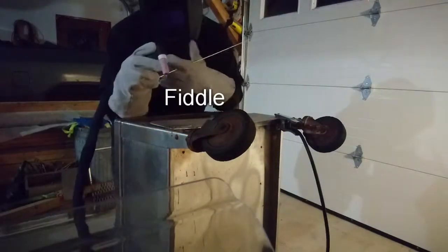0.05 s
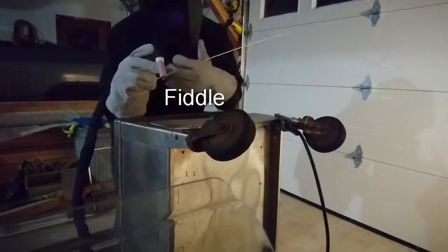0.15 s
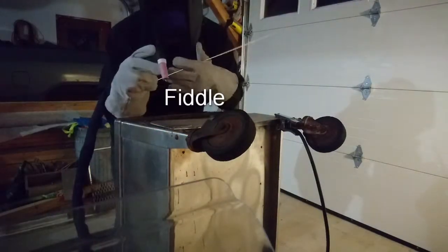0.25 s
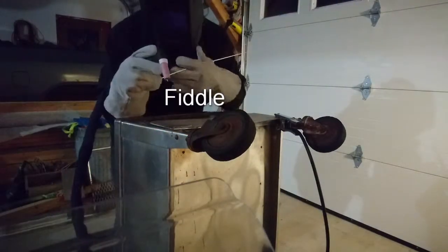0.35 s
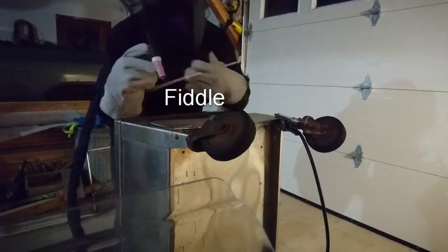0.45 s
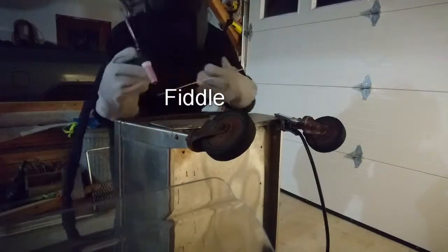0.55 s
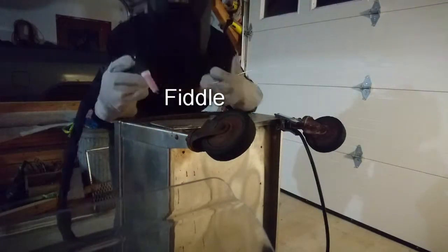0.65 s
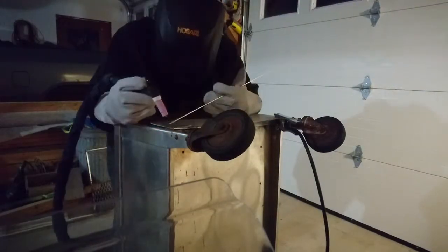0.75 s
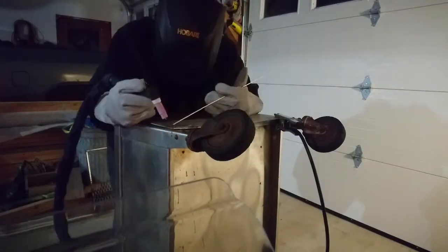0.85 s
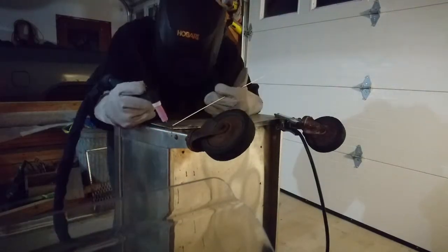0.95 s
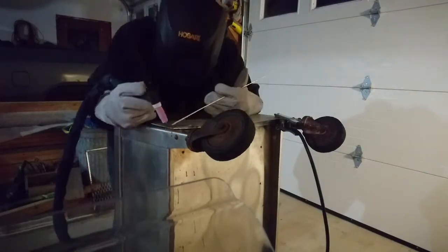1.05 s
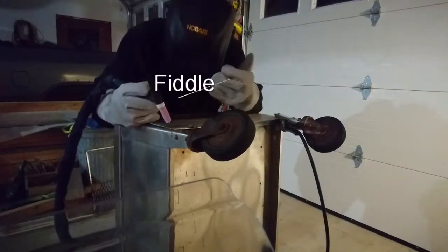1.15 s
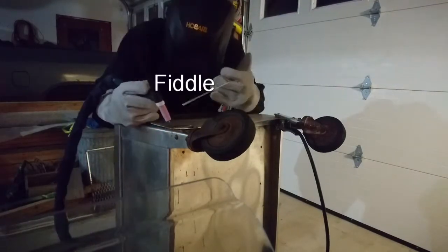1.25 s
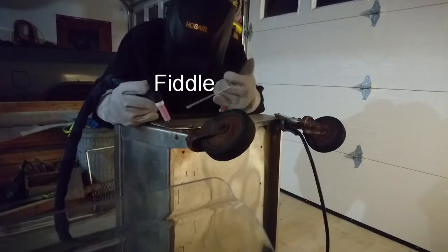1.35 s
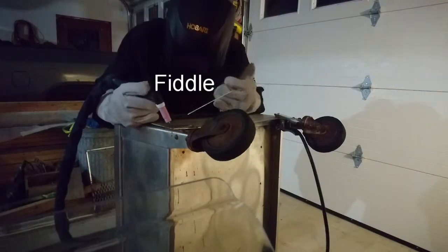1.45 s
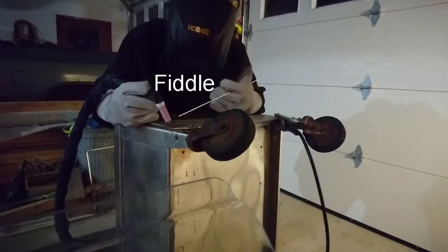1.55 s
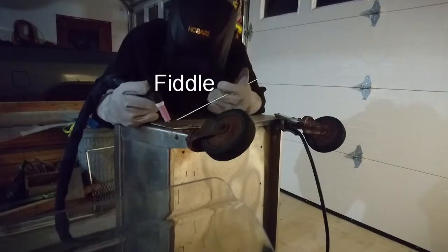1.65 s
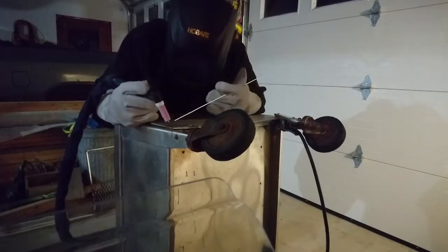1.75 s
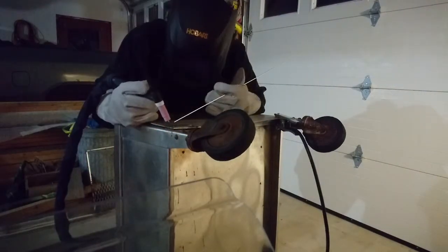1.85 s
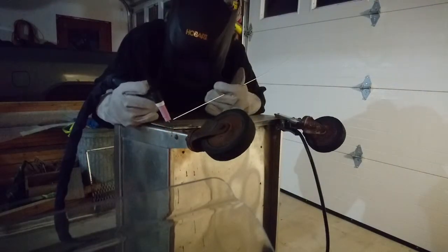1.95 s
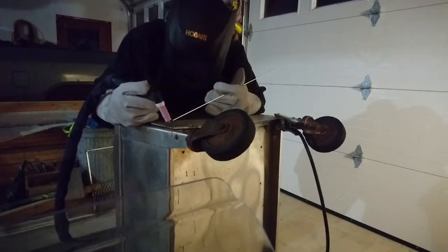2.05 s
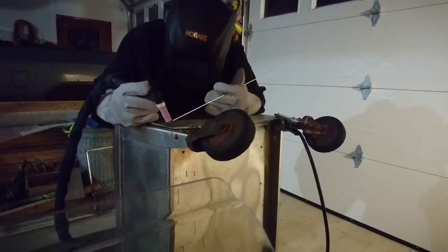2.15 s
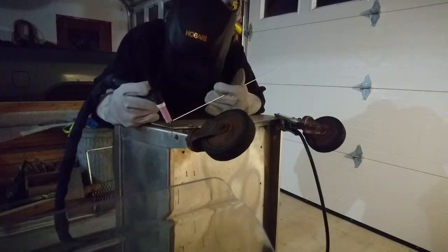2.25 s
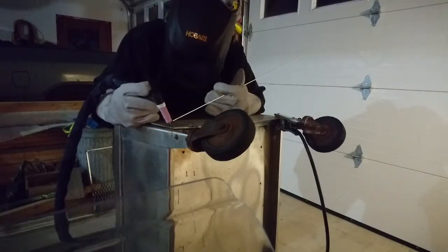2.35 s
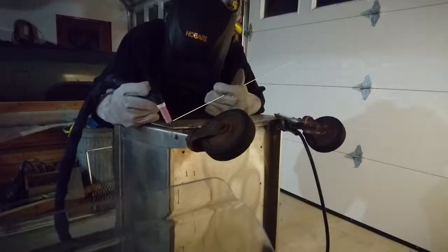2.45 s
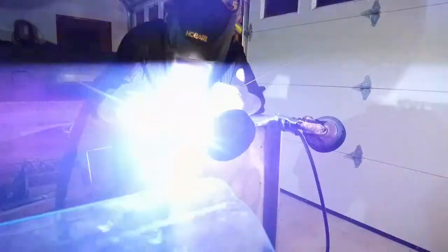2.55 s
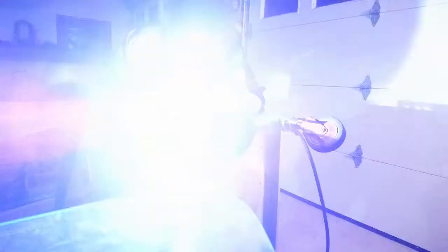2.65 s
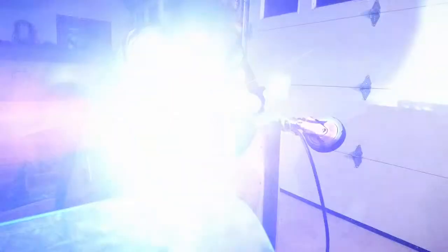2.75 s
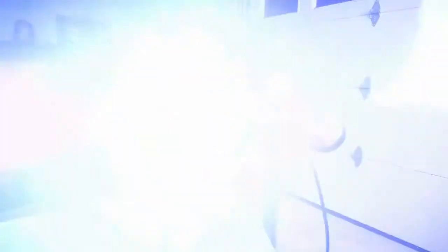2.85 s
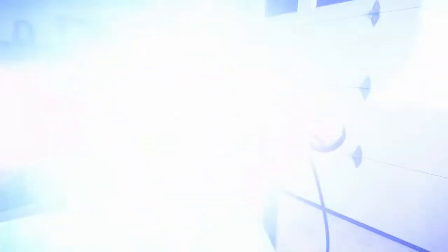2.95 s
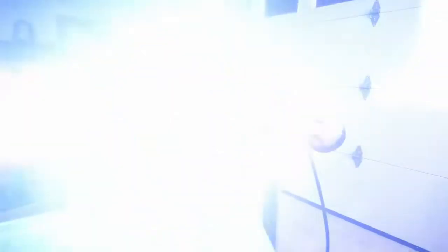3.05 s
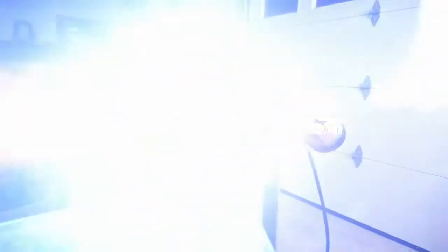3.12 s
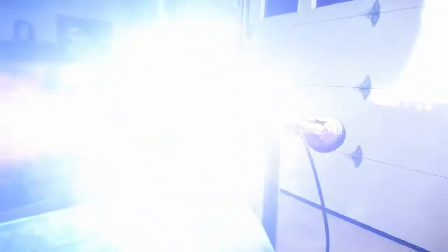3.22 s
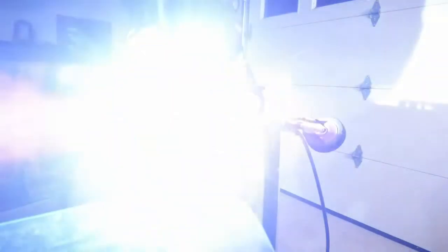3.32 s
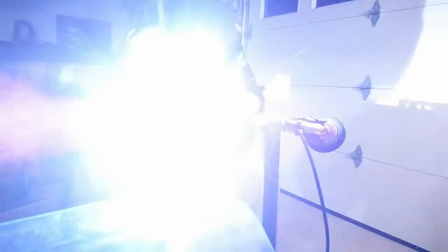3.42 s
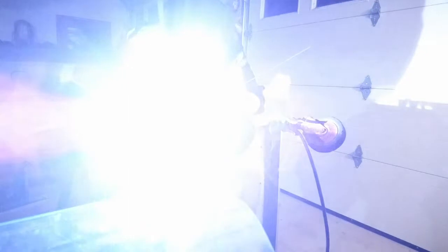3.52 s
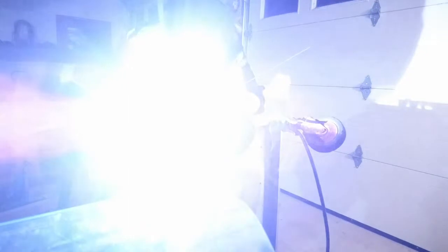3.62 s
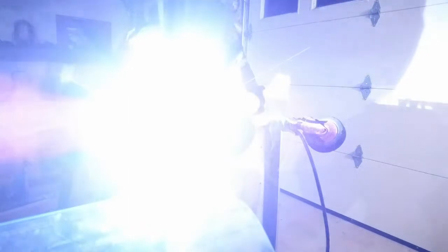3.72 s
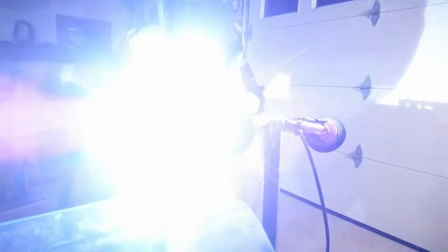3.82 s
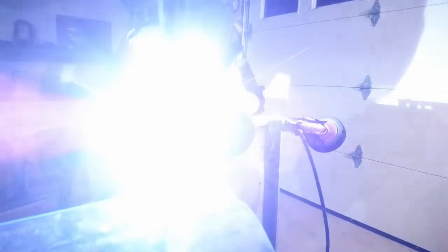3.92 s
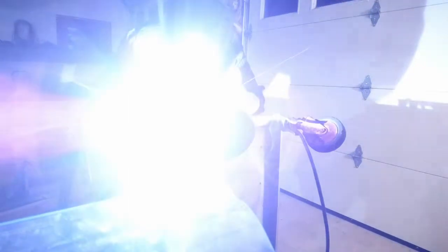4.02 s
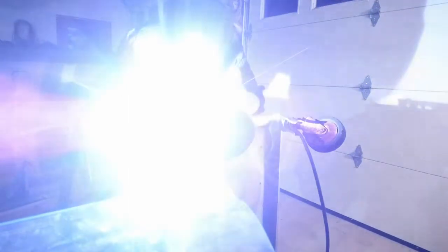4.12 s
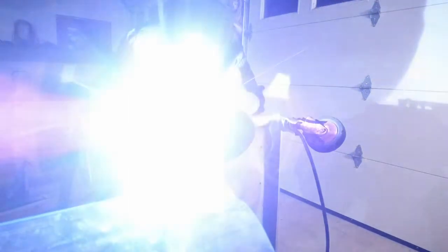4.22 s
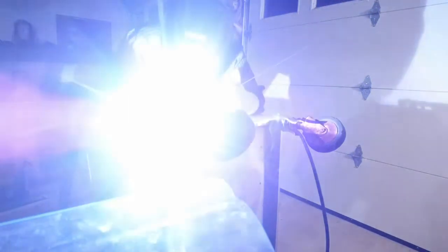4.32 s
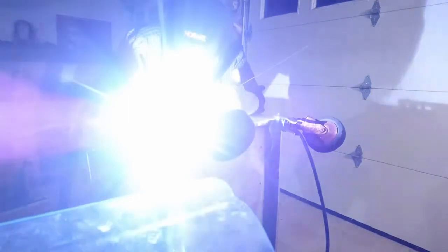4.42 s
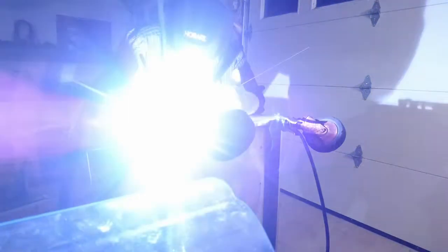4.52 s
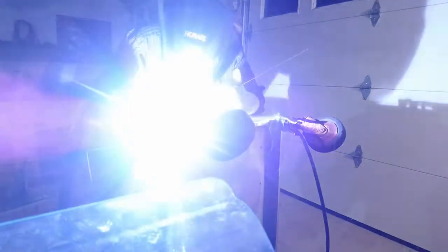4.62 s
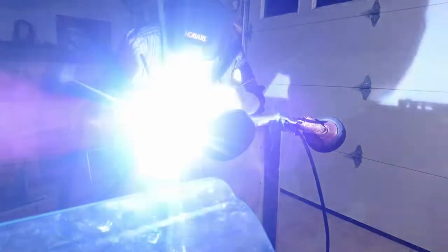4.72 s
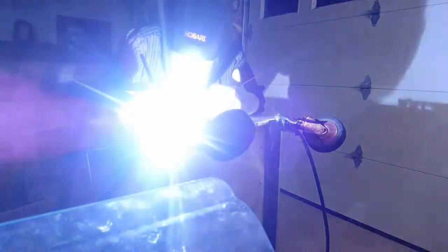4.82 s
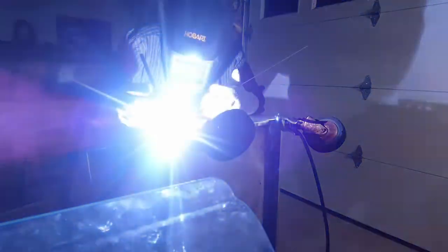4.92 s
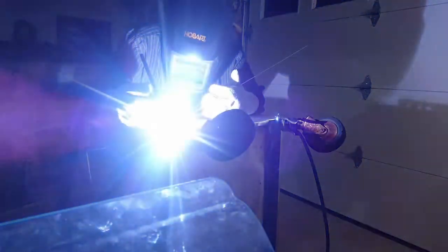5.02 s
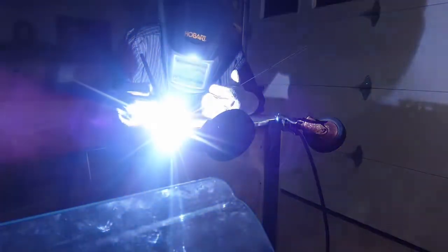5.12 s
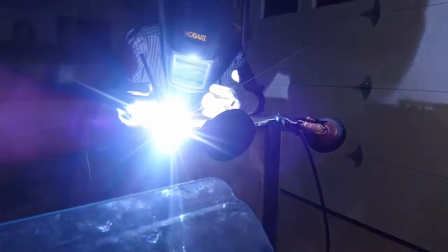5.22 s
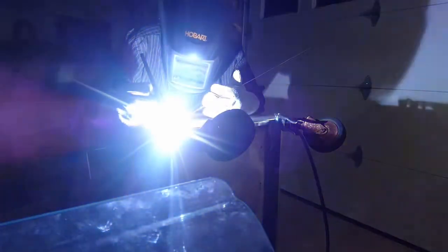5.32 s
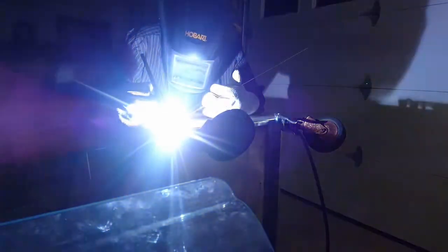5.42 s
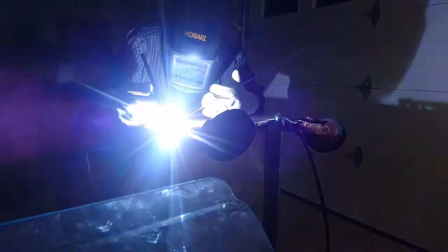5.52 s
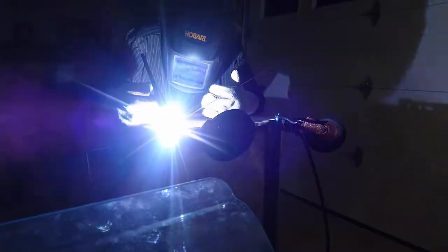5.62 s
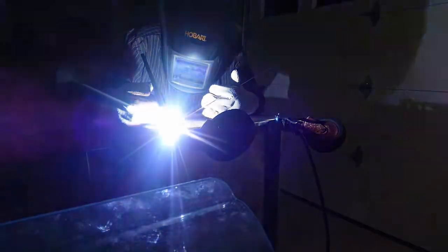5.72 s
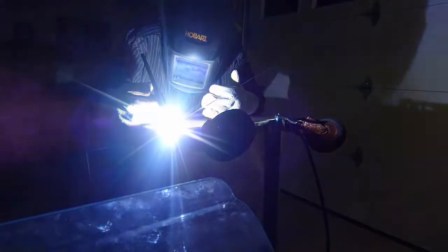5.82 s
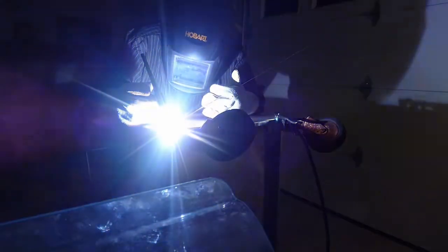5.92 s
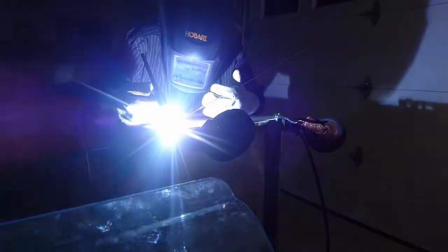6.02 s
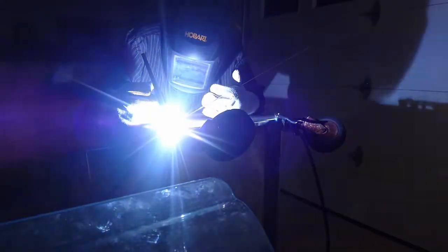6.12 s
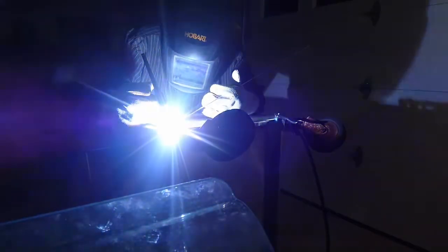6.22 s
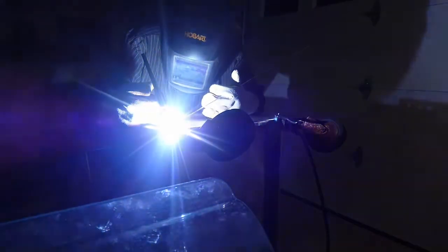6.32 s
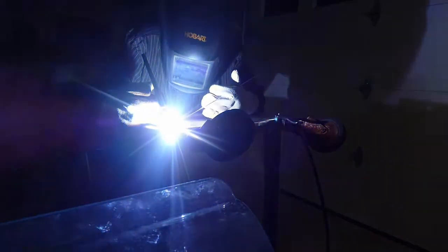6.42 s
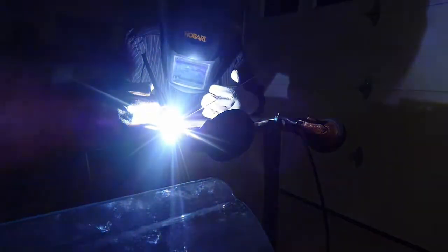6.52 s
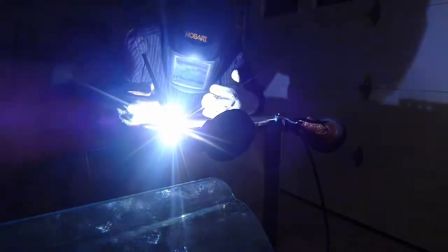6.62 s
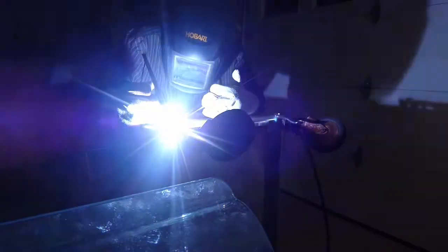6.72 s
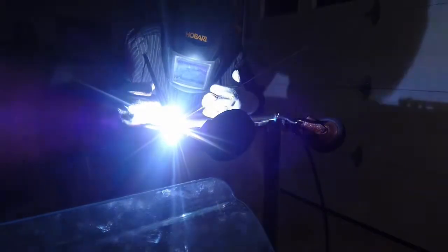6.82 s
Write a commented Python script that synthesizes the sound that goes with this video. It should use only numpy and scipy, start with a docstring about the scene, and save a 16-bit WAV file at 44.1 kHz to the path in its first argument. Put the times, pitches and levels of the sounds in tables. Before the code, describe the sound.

Low, airy fan drone fills the opening. Then a sharp snap, a quick low spit and a thin hiss lead within half a second into a bright, rasping alternating-current welding buzz. It starts fuller, settles, wavers slightly once and keeps sizzling over the fan. Metal cabinet and garage walls add short hard echoes; the stereo microphone is nearby.

```python
"""Arc welding in a garage

In the background the welder's cooling fan hums: shaped noise, housing resonances and steady tones.
A spark lights the arc on a steel cabinet; bursts and bands of noise sputter, then calm to a soft hiss.
Then alternating current: two snaps a cycle, built from harmonics, make a hard, steady buzz,
coloured by the echoes of cabinet and walls, with crackle at each snap and a steady sizzle throughout.
Two microphone channels differ in level, phase and echoes; deep bass and top treble are cut."""
import sys
import numpy as np
from scipy import signal
from scipy.fft import rfft, irfft, next_fast_len
from scipy.io import wavfile
from scipy.ndimage import map_coordinates

SR = 44100
rng = np.random.default_rng(int(sys.argv[2]) if len(sys.argv) > 2 else 0)


def transcribe(u):
    """Save the signal u as a 16-bit wav file named by the first command-line argument.

    u: samples, shape (n,) or (channels, n), limited to [-1, 1]; the rate is SR.
    q: integer samples, one column per channel.
    """
    v = np.clip(np.atleast_2d(u).T, -1, 1)
    q = np.round(v * 32767).astype(np.int16)
    wavfile.write(sys.argv[1], SR, q)


N = 302526

STRIKE_S, BUZZ_S = 2.576, 2.9595  # the arc lights; the current starts to alternate
CYCLE_HZ = 48.256  # rate of the alternating current
REVERSAL_S = .00795  # from the first reversal of the current in a cycle to the second
TOP_HZ = 15800  # upper band limit of the microphone


def amp(db):
    """Decibels to gain."""
    return 10 ** (np.asarray(db) / 20)


def unit(x):
    """Scale to rms 1."""
    return x / np.sqrt(np.mean(x ** 2) + 1e-20)


def along(points, hz):
    """Interpolate (Hz, value) points on a log frequency axis."""
    f, v = np.transpose(points)
    return np.interp(np.log(hz + 1), np.log(f + 1), v)


def over_time(points, t):
    """Interpolate (s, value) points at the times t."""
    return np.interp(t, *np.transpose(points))


def clock():
    """The time of every sample in seconds."""
    return np.arange(N) / SR


def wobble(rate):
    """A smooth random curve, rate knots a second."""
    knots = rng.standard_normal(int(N * rate / SR) + 4)
    return map_coordinates(knots, [clock() * rate])


def filtered(x, response):
    """Multiply the spectrum of x by a response of frequency."""
    m = next_fast_len(N + SR // 2)
    spectrum = rfft(x, m) * response(np.fft.rfftfreq(m, 1 / SR))
    return irfft(spectrum, m)[..., :N]


def shape(spectrum):
    """The gain function of a (Hz, dB) spectrum."""
    return lambda hz: amp(along(spectrum, hz))


def channel_gains(tilt, hz):
    """Left and right gains for a level difference that depends on frequency."""
    return amp(np.outer([.5, -.5], along(tilt, hz)))


def noise(colour, tilt, alike=((1, 0),)):
    """Stereo noise of rms 1 with a given gain, balance and left-right likeness over frequency."""
    def mid_side(hz):
        # the angle between mid and side sets the correlation of left and right
        turn = np.arccos(np.clip(along(alike, hz), -1, 1)) / 2
        return np.array([np.cos(turn), np.sin(turn)])

    mid, side = filtered(rng.standard_normal((2, N)), mid_side)
    left_right = np.array([mid + side, mid - side])
    return unit(filtered(left_right, lambda hz: colour(hz) * channel_gains(tilt, hz)))


# Rumble of the churning air. Each row: frequency in Hz, relative level in dB per Hz.
FAN_BODY = [(13, -68), (22, -45), (37, -55), (75, -17), (124, -21), (169, -5.5), (206, -0.5), (243, -3.5),
            (276, -9), (304, -10.5), (413, -3), (462, -10.5), (620, -28.5), (810, -44.5), (1360, -120)]
# Thin rush of air above it. Each row: frequency in Hz, relative level in dB per Hz.
FAN_AIR = [(330, -17.5), (560, -2.5), (735, -8), (835, -6), (1000, -10.5), (1280, -13), (1750, -15),
           (1960, -13.5), (2900, -17.5), (3500, -21.5), (5500, -29.5), (7500, -44.5), (10000, -56),
           (15000, -77)]
# Resonances of the fan housing. Each row: frequency in Hz, width in Hz, relative level in dB.
HOUSING = [(205.3, 37, 2), (413.4, 39, -5.5)]
# Steady fan tones. Each row: frequency in Hz, middle level in dB before the wobble and balance.
FAN_TONES = [(269.6, -34), (539.2, -45.5), (818, -51)]
# Fan noise at the two channels. Each row: frequency in Hz, likeness from 0 to 1.
FAN_ALIKE = [(40, .85), (130, .99), (260, .985), (420, .95), (560, .7), (800, .4), (2000, .1), (8000, 0)]
# Fan noise balance. Each row: frequency in Hz, left minus right in dB.
FAN_TILT = [(60, -2.5), (110, 3.5), (200, -2), (380, -3.5), (700, -2.5), (1290, -1), (2380, -1),
            (4400, -2.0), (8120, -12), (15000, -2.5)]
# Phase of the fan rumble. Each row: frequency in Hz, lead of the left channel in radians.
FAN_LEAD = [(80, 0), (200, -.18), (420, -.25), (700, -.4)]
FAN_DB = -24.5  # rumble before the load
FAN_LOAD_DB = 0.18  # the hum is slightly stronger under load


def fan():
    """Air churns in the welder's housing, with steady tones and a thin rush above."""
    def housing(hz):
        return sum(amp(db) / (1 + (2 * (hz - centre) / width) ** 2) for centre, width, db in HOUSING)

    def lead(hz):
        return np.exp(1j * np.outer([.5, -.5], along(FAN_LEAD, hz)))

    body = amp(-1.0) * noise(shape(FAN_BODY), FAN_TILT, FAN_ALIKE)
    resonance = amp(-4.5) * noise(housing, FAN_TILT, FAN_ALIKE)
    rumble = filtered(body + resonance, lead)
    air = amp(-36.0) * noise(shape(FAN_AIR), FAN_TILT, FAN_ALIKE)
    turning = clock() + 0.00056 * wobble(3)  # the pitch drifts a little
    tones = np.zeros(N)
    for hz, db in FAN_TONES:
        tones += amp(db + 1.7 * wobble(4.03)) * np.sqrt(2) * np.sin(2 * np.pi * hz * turning)
    load_db = FAN_LOAD_DB * (clock() > STRIKE_S)
    return amp(FAN_DB + load_db) * rumble + air + tones * amp([[-1.5], [1.5]])


# Sparks and spits. Each row: start in seconds, crack level in dB, t60 in seconds,
# low thump in dB relative to the crack, ring in dB relative to the crack.
SPARKS = [(2.576, -16, 0.058, -12, -15), (2.584, -26, .03, -5, -12), (2.6193, -22, 0.013, 1, -12),
          (2.627, -25, .02, -7, -12), (2.6645, -29, .022, 15, -6), (2.673, -25, 0.02, 5, 0),
          (2.696, -28.5, .03, 9, -6), (2.7047, -27, 0.022, 7, 2), (2.726, -32, 0.016, 3, 0),
          (2.738, -38, .035, 8, -6), (2.9532, -37, 0.022, 9, -15), (2.959, -20, .012, -1, -10),
          (2.9667, -14.5, .01, -4, -10)]
# Crack of a spark. Each row: frequency in Hz, relative level in dB per Hz.
SPARK_CRACK = [(100, -70), (530, -40), (900, -9.5), (1270, -17), (1510, -4), (2780, -3.5), (3060, -5),
               (4600, -5), (5770, -2.5), (8170, -18), (15800, -40)]
# Hiss of the young arc. Each row: frequency in Hz, relative level in dB per Hz.
HISS = [(880, -27), (1500, -0.5), (2410, -11), (2930, 1), (4100, -4), (5730, -7), (9850, -25), (12700, -21),
        (15800, -21)]
# Low sputter and thumps. Each row: frequency in Hz, relative level in dB per Hz.
SPUTTER = [(80, -60), (250, -27), (500, 9.5), (900, 1), (1400, 2.5), (2200, -56), (5000, -30)]
# Ring of a spit, likely in the torch's cup. Each row: frequency in Hz, relative level in dB per Hz.
CUP_RING = [(2300, -37), (2800, 10), (3000, 2), (3200, -13), (3800, -27)]
# Balance of the arc at the two channels. Each row: frequency in Hz, left minus right in dB.
ARC_TILT = [(1000, -1), (2500, -0.5), (5000, -2), (6300, -6), (9500, -9.5), (12500, 2), (15000, -2)]
WET_S = 2.71  # the metal wets
HISS_DB, HISS_CALM_DB, HISS_CALM_S = -30, -13.5, 0.067  # young level, change once calm, time constant
SPUTTER_DB, SPUTTER_RISE_DB_PER_S, SPUTTER_FALL_DB_PER_S = -30, 147, 90  # loudest as the metal wets
FLUTTER_DB = 1.4  # unevenness of the young arc


def ignition():
    """A spark jumps the gap; the young arc hisses and spits until the metal wets, then calms."""
    t = clock()
    burning = (t >= STRIKE_S) & (t < BUZZ_S)
    before, after = np.maximum(WET_S - t, 0), np.maximum(t - WET_S, 0)
    sputter_db = SPUTTER_DB - SPUTTER_RISE_DB_PER_S * before - SPUTTER_FALL_DB_PER_S * after
    hiss_db = HISS_DB + HISS_CALM_DB * (1 - np.exp(-after / HISS_CALM_S))
    flutter = burning * amp(FLUTTER_DB * wobble(190))

    crack, thump, ring = np.zeros(N), np.zeros(N), np.zeros(N)
    for start, db, t60, thump_db, ring_db in SPARKS:
        fade = (t >= start) * amp(db - 60 * np.clip((t - start) / t60, 0, 2))
        crack += fade
        thump += amp(thump_db) * fade
        ring += amp(ring_db) * fade

    low = (flutter * amp(sputter_db) + thump) * noise(shape(SPUTTER), ARC_TILT)
    hiss = flutter * amp(hiss_db) * noise(shape(HISS), ARC_TILT)
    cracks = crack * noise(shape(SPARK_CRACK), ARC_TILT)
    rings = ring * noise(shape(CUP_RING), ARC_TILT)
    return low + hiss + cracks + rings


# A snap and its near echoes. Each row: left delay in seconds, right delay in seconds, level in dB.
ECHOES = [(0, .00012, 2), (.00085, .001, -6), (.0021, .0022, -3), (.0036, .0035, -9), (.0058, .0056, -10),
          (.0067, .0069, -6)]
# Decay of the room's tail. Each row: frequency in Hz, t60 in seconds.
GARAGE_DECAY = [(300, 0.19), (3000, 0.63), (14000, 0.1)]


def garage():
    """The way of a snap to each channel: near echoes, scatter from the cabinet, then the room's tail."""
    scatter_db, scatter_t60, tail_db = -7, .022, -4.5
    hz, t, z = signal.stft(rng.standard_normal((2, SR // 3)), SR, nperseg=256)
    decay = amp(-60 * t / along(GARAGE_DECAY, hz)[:, None])
    tail = signal.istft(z * decay, SR, nperseg=256)[1]
    tail_time = np.arange(tail.shape[1]) / SR
    scatter = rng.standard_normal(tail.shape) * amp(-60 * tail_time / scatter_t60)

    mirror = np.zeros(tail.shape)
    for left, right, db in ECHOES:
        mirror[[0, 1], [round(left * SR), round(right * SR)]] += amp(db)
    # the low notes and the high treble arrive mostly scattered
    mirror = signal.lfilter(*signal.butter(2, [1000, 6500], 'bandpass', fs=SR), mirror)

    tail = amp(tail_db) * tail / np.linalg.norm(tail[0])
    scatter = amp(scatter_db) * scatter / np.linalg.norm(scatter[0])
    return mirror + tail + scatter


# General strength of the harmonics. Each row: frequency in Hz, relative level of each harmonic in dB.
SNAP = [(200, -80), (550, -55), (950, -53.5), (1300, -52.5), (2000, -52.5), (2400, -55.5), (2750, -55.5),
        (3100, -54.5), (3600, -54), (4000, -51), (4350, -53.5), (4900, -56), (5500, -53.5), (6100, -54.5),
        (7200, -57), (8100, -58), (9300, -53.5), (12000, -54), (14000, -56), (15300, -52.5)]
# How far chance echoes make the harmonics differ. Each row: frequency in Hz, exponent (0 is even).
UNEVEN = [(1500, .6), (6200, .6), (7500, 1.4), (10000, 1)]
# Harmonics that cabinet and room reinforce. Each row: multiple of the cycle rate,
# left and right relative level in dB before the common lift.
STRONG = [(13, -53, -51), (14, -56, -54), (20, -50, -49), (24, -46, -51), (25, -54, -50), (28, -49, -43.5),
          (29, -51, -43.5), (31, -49, -47), (32, -51, -48), (35, -51, -45), (38, -47, -46), (39, -49, -45),
          (41, -50, -48), (42, -42.5, -43.5), (46, -50, -48), (52, -46, -52), (53, -47, -52),
          (57, -46, -55), (59, -55, -38), (62, -52, -47), (63, -46, -39), (64, -47, -43), (66, -47, -45),
          (67, -55, -42), (69, -44, -52), (70, -43, -44), (73, -43, -48), (74, -44, -44.5), (75, -44, -52),
          (77, -45, -50), (91, -43.5, -46), (92, -49, -45), (94, -49, -40), (95, -40, -40), (97, -54, -44),
          (98, -52, -46), (105, -50, -47), (106, -51, -47), (109, -46, -43), (112, -54, -44),
          (113, -43, -48), (119, -52, -46), (123, -53, -36), (126, -44, -42.5), (127, -54, -41),
          (129, -56, -41), (130, -51, -50), (134, -61, -45), (137, -55, -51), (144, -60, -45.5),
          (154, -57, -49)]
# Phase of the standing waves. Each row: frequency in Hz, lead of the left channel in radians.
STANDING_TURN = [(1400, 1.2), (2300, 1.6), (2700, -1.9), (3600, -1.3), (4500, -1), (6200, -1.1),
                 (7500, -1.2)]
STRONG_LIFT_DB = 4.6  # lifts the standing waves over the rest


def arc_cycle(size=8192):
    """One cycle at the microphone: the arc relights with a snap at each reversal of the current."""
    hz = CYCLE_HZ * np.arange(int(TOP_HZ / CYCLE_HZ))
    two_snaps = .85 + np.exp(-2j * np.pi * hz * REVERSAL_S)
    # a transform of one second has one bin per Hz
    heard = two_snaps * rfft(garage(), SR)[:, np.round(hz).astype(int)]
    # echoes make the harmonics uneven, and standing waves lift some well above the rest
    unevenness = unit(unit(np.abs(heard)) ** along(UNEVEN, hz))
    strength = unevenness * shape(SNAP)(hz) * channel_gains(ARC_TILT, hz)
    phase = np.angle(heard)
    for multiple, left, right in STRONG:
        phase[0, multiple] = phase[1, multiple] + along(STANDING_TURN, hz[multiple])
        strength[:, multiple] = amp(STRONG_LIFT_DB) * amp([left, right])
    return unit(irfft(strength * np.exp(1j * phase), size))


# Level of the buzz. Each row: time in seconds, level in dB before the extra of cold metal.
BUZZ_LEVEL = [(3.0, -30.5), (3.5, -30.5), (4.0, -30), (4.46, -29.5), (4.58, -29), (5.35, -28.5),
              (5.85, -29.5), (6.3, -28.5), (6.8, -28.5)]
# Lower notes of the buzz. Each row: time in seconds, change of level in dB.
LOW_NOTES = [(3.3, -0.5), (3.55, -1), (4.45, 0), (4.6, 2.5), (5.0, 0.5), (6.5, 1), (6.72, 2)]
# Unsteady timing of the snaps. Each row: time in seconds, scatter in seconds.
JITTER = [(4.05, .000003), (4.17, .00004), (4.31, .00002), (4.39, .00011), (4.48, .0001), (4.55, .000003)]
# Extra colour of the snaps on cold metal. Each row: frequency in Hz, gain in dB.
COLD_COLOUR = [(700, 6), (1400, 6.5), (2500, 2), (6000, -1), (12000, -16)]
# Steady sizzle of the hot gas. Each row: frequency in Hz, relative level in dB per Hz.
SIZZLE = [(500, -20), (1100, -5.5), (2000, 0), (2450, -7), (3200, -6), (4100, 0.5), (5000, -3.5),
          (6200, -5.5), (8000, -7), (11000, -12), (14000, -9.5), (15500, -9)]
# Rough edge of a snap. Each row: frequency in Hz, relative level in dB per Hz.
CRACKLE = [(900, -24), (1500, 3), (2000, -1), (2450, 11), (3100, 13), (4000, 3), (5000, 7), (6200, -27),
           (7200, -30), (9500, -34), (15000, -28)]
# Narrow ring of the unsteady arc. Each row: frequency in Hz, relative level in dB per Hz.
FLARE = [(2650, -40), (2820, 4), (2890, -4), (3050, -40)]
COLD_EXTRA_DB, COOL_START_S = 4.5, 0.3  # starts loud on cold metal, then settles
LOW_NOTES_HZ = 2200  # upper edge of the lower notes
SLIP_START_S, SLIP_END_S, SLIP_LAG_S = 4.37, 4.48, .0012  # the timing slips once
SNAP_SCATTER_DB, CRACKLE_SCATTER_DB = 0.35, 2.2  # spread from snap to snap
CRACKLE_DB, CRACKLE_S = 2.5, 0.0012  # middle level over the buzz level, decay time constant
FLARE_S, FLARE_WIDTH_S, FLARE_DB = 4.155, .035, -6.5  # centre, half width, peak over the buzz level


def buzz():
    """The cycle repeats at the welder's rate; each snap crackles anew and a steady sizzle runs throughout."""
    t = clock()
    age = np.maximum(t - BUZZ_S, 0)
    cold = np.exp(-age / COOL_START_S)
    level_db = over_time(BUZZ_LEVEL, t) + COLD_EXTRA_DB * np.exp(-(age / COOL_START_S) ** 2)

    # the torch sways in the hand; for a moment the snaps jitter, and their timing slips once
    lag = np.interp(t, [SLIP_START_S, SLIP_END_S], [0, SLIP_LAG_S])
    sway = .00001 * wobble(3) + over_time(JITTER, t) * wobble(96)
    cycles = CYCLE_HZ * (t - BUZZ_S - lag - sway)
    snaps = np.array([np.interp(cycles, np.arange(len(channel)) / len(channel), channel, period=1)
                      for channel in arc_cycle()])

    # on cold metal the snaps are fuller and duller
    snaps = (1 - cold) * snaps + cold * filtered(snaps, shape(COLD_COLOUR))
    lower = filtered(snaps, lambda hz: 1 / (1 + (hz / LOW_NOTES_HZ) ** 6))
    snaps = snaps + (amp(over_time(LOW_NOTES, t)) - 1) * lower

    # every reversal of the current has its own strength
    within = cycles % 1 / CYCLE_HZ
    second = within >= REVERSAL_S
    which = np.maximum(2 * np.floor(cycles) + second, 0).astype(int)
    chance = np.clip(rng.standard_normal(which.max() + 1), -2, 2)[which]
    since_snap = within - REVERSAL_S * second
    edge = amp(CRACKLE_DB + CRACKLE_SCATTER_DB * chance) * np.exp(-since_snap / CRACKLE_S)

    sizzle = amp(-5.5 + 0.63 * wobble(60)) * noise(shape(SIZZLE), ARC_TILT)
    crackle = edge * noise(shape(CRACKLE), ARC_TILT)
    # the unsteady arc briefly excites a narrow ring
    swell = np.exp(-((t - FLARE_S) / FLARE_WIDTH_S) ** 2)
    flare = amp(FLARE_DB) * swell * noise(shape(FLARE), ARC_TILT)
    lit = np.clip((t - BUZZ_S) / .0005 + 1, 0, 1)
    snaps = amp(1.0 + SNAP_SCATTER_DB * chance) * snaps
    return lit * amp(level_db) * (snaps + sizzle + crackle + flare)


# Brief dips in the background level. Each row: centre in seconds, depth in dB, half width in seconds.
LEVEL_DIPS = [(.775, -14, 0.0065), (1.176, -10, 0.01), (1.81, -20, 0.004)]


def scene():
    """The fan behind, then ignition and the running arc; the background level dips briefly."""
    dips_db = sum(db * np.exp(-((clock() - s) / width) ** 2) for s, db, width in LEVEL_DIPS)
    return amp(dips_db) * fan() + ignition() + buzz()


def record(dry):
    """The camera's microphone sheds the deepest bass and keeps nothing above its band limit."""
    low_cut_hz = 44

    def response(hz):
        band = np.clip((TOP_HZ - hz) / 200 + .5, 0, 1)
        return band * hz ** 2 / np.hypot(hz ** 2, low_cut_hz ** 2)

    return filtered(dry, response)


dry = scene()
out = record(dry)
transcribe(out)
```